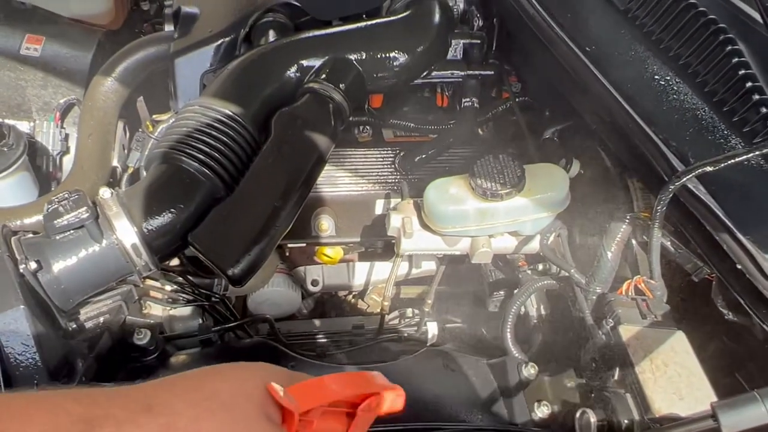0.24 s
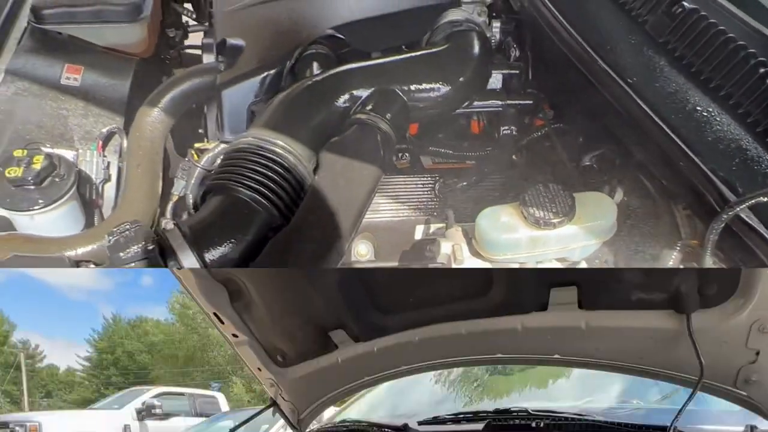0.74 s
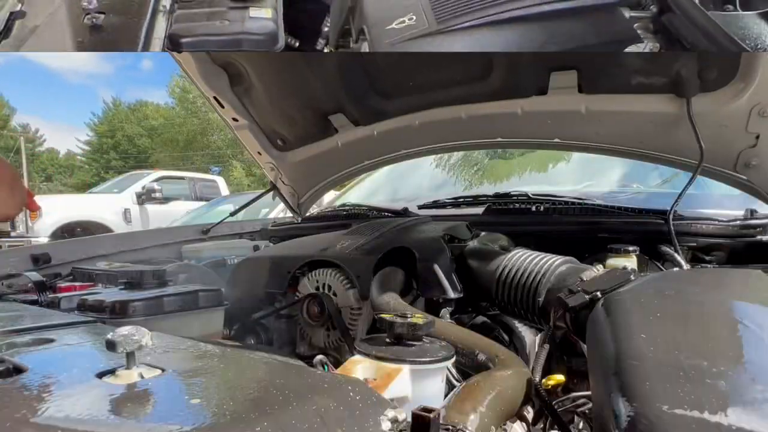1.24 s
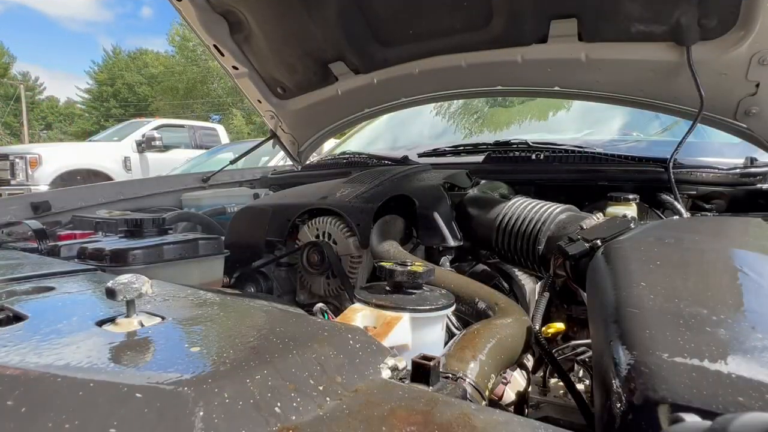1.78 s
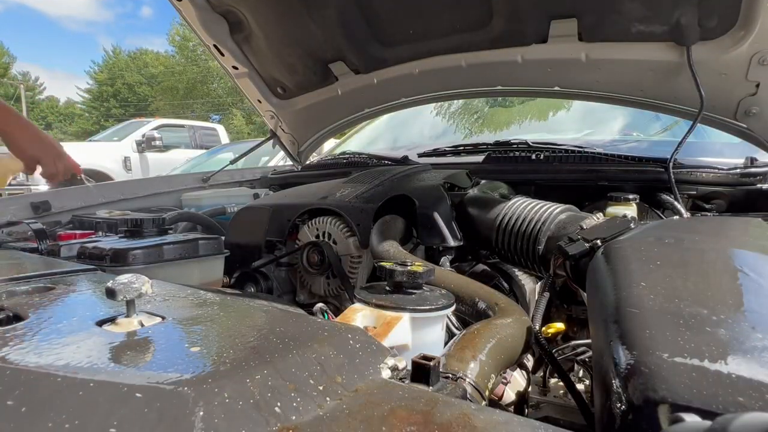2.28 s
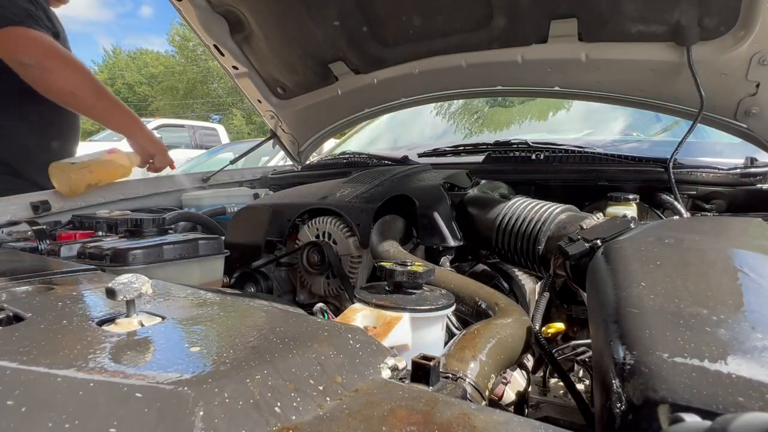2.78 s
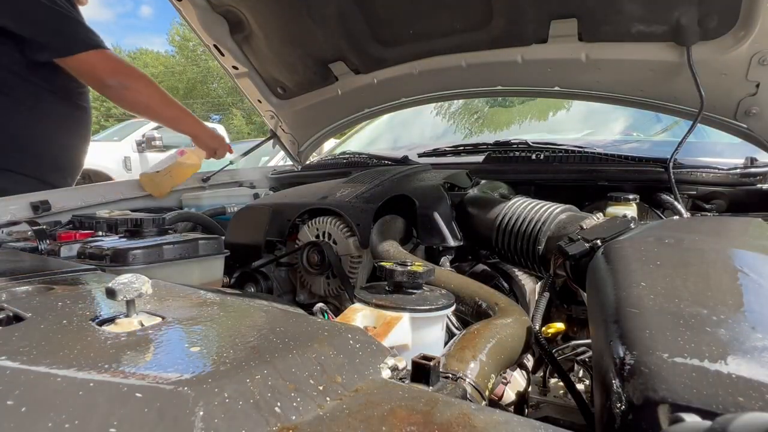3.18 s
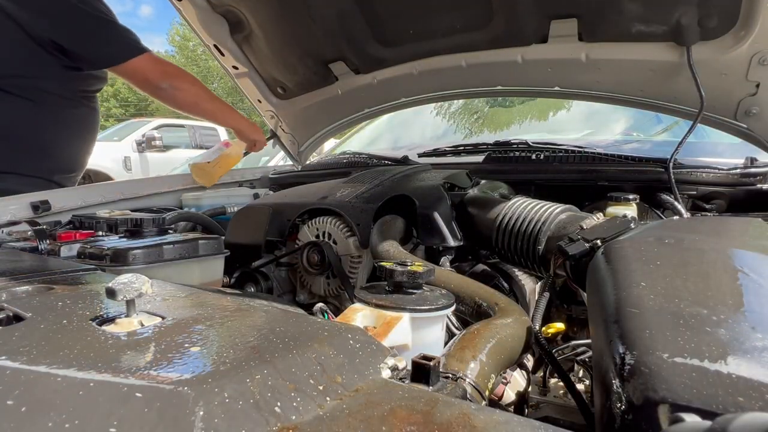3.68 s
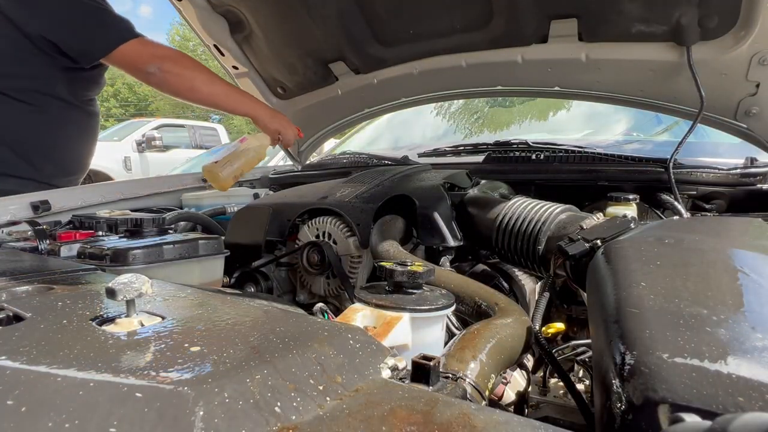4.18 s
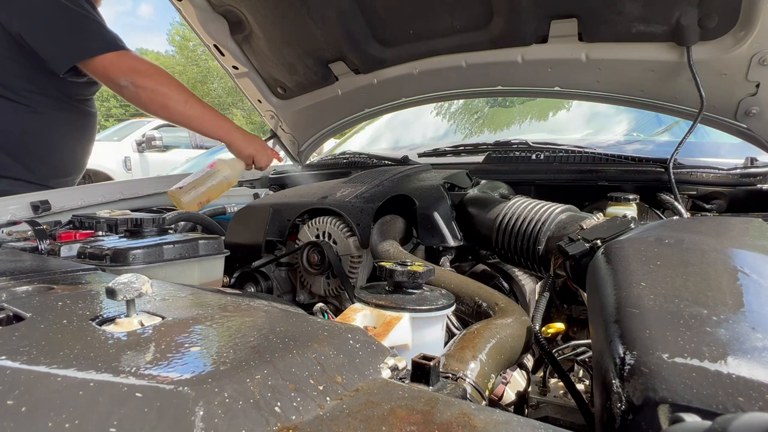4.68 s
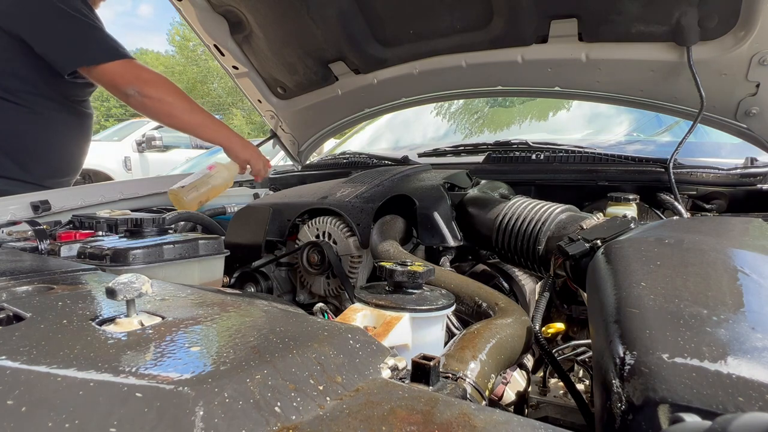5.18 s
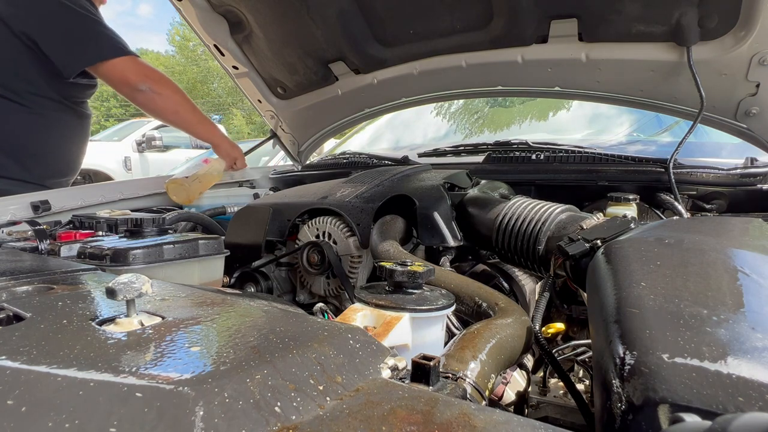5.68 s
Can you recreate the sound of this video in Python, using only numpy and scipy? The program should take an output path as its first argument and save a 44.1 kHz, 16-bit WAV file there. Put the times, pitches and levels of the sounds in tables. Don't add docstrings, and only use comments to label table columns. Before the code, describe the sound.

Outdoors at an open engine bay, a plastic trigger sprayer is squeezed slowly up close: hard snap, breathy hiss, suck of air and rattle back. Just after one second it switches to quick, even pulls further off, each a click, short bright hiss, dull bottle knock and small return rattle. Liquid sloshes faintly. One phone microphone, mono, with soft yard air and low drone.

```python
import sys
import numpy as np
from scipy import signal
from scipy.fft import rfft, irfft
from scipy.io import wavfile
from scipy.ndimage import uniform_filter1d

SR = 44100
rng = np.random.default_rng(int(sys.argv[2]) if len(sys.argv) > 2 else 0)


def nominal_scale(level):
    x = np.asarray(level, float) / 20
    return 10 ** x


def pcm_store(signal):
    levels = np.round(np.clip(np.atleast_2d(signal), -1, 1) * 32767)
    wavfile.write(sys.argv[1], SR, levels.astype(np.int16).T)


N = 261954


def colour(x, table, extra_db=0):
    hz = np.maximum(np.arange(len(x) // 2 + 1) * SR / len(x), 1)
    f, db = np.transpose(table)
    gain_db = np.interp(np.log(hz), np.log(f), db) + extra_db
    y = irfft(rfft(x) * nominal_scale(gain_db), len(x))
    return y / np.sqrt(np.mean(y ** 2))


def ring(x, hz, width_hz):
    return signal.lfilter(*signal.iirpeak(min(hz, 20000), hz / width_hz, fs=SR), x)


def cut(x, hz, kind):
    return signal.lfilter(*signal.butter(2, hz, kind, fs=SR), x)


def walk(rate, size):
    k = int(SR / rate)
    steps = np.repeat(rng.standard_normal(size // k + 1), k)
    return 1.176 * uniform_filter1d(steps, k)[:size]


def add(out, x, s):
    i = int(s * SR)
    x = x[max(-i, 0):N - i]
    out[max(i, 0):max(i, 0) + len(x)] += x


def strokes():
    # start_s, end_s, early_db, middle_db, treble_minus_presence_db
    slow_jets = [(-0.05, 0.069, -28, -20, -6), (0.125, 0.133, -36, -33.5, -15),
                 (0.3154, 0.434, -23.5, -21, -7), (0.488, 0.501, -42, -34, -18),
                 (0.668, 0.772, -28.5, -25.0, -6), (0.829, 0.851, -46, -41, -11),
                 (0.931, 1.012, -36.5, -33, 6), (1.043, 1.097, -32, -32, -2),
                 (1.0862, 1.142, -25.5, -28, 4)]
    # time_s, level_db, ring_hz, treble_minus_presence_db
    slow_clicks = [(0.1334, -28.5, 4500, -21), (0.1798, -34.5, 5900, -34), (0.2697, -58, 4440, -33),
                   (0.2835, -52, 4500, -20), (0.307, -42, 2580, -4), (0.315, -10.5, 4460, -31),
                   (0.498, -31, 4420, -10), (0.5513, -37.5, 4480, -33), (0.6585, -39, 3200, -21),
                   (0.668, -14.5, 4060, -28), (0.847, -35, 6980, -4), (0.9026, -45, 3200, -34),
                   (0.997, -36, 4400, -20), (1.0323, -21.5, 4230, -40), (1.0867, -23.5, 4470, -1),
                   (1.1684, -38, 5330, -21)]
    # snap_s, snap_db, ring_hz, jet_length_s, jet_db
    fast_pulls = [(1.2118, -16.5, 4300, 0.046, -27.5), (1.3317, -20, 4640, 0.054, -27),
                  (1.451, -22, 4000, 0.049, -30.5), (1.571, -24, 4830, 0.051, -29),
                  (1.6925, -21.5, 9100, 0.057, -27), (1.8192, -20.5, 5060, 0.058, -28),
                  (1.947, -24, 5130, 0.056, -28.5), (2.076, -24, 4070, 0.055, -28.5),
                  (2.202, -22.5, 4600, 0.043, -28.5), (2.3222, -18, 5150, 0.05, -26.5),
                  (2.4454, -26, 7200, 0.059, -28), (2.5726, -19, 10200, 0.053, -27.5),
                  (2.6975, -20, 9300, 0.056, -27.5), (2.824, -20.5, 9100, 0.054, -27.5),
                  (2.948, -17, 7500, 0.051, -27.5), (3.075, -20.5, 5440, 0.048, -26),
                  (3.1992, -18.5, 7300, 0.062, -28), (3.33, -21.5, 3440, 0.056, -29.5)]
    more_fast_pulls = [(3.4543, -20.5, 9500, 0.053, -27.5), (3.5871, -23, 9500, 0.059, -28),
                       (3.726, -18.5, 5050, 0.056, -28), (3.8586, -20, 7300, 0.059, -27),
                       (3.9942, -20.5, 3220, 0.06, -27), (4.1324, -18, 7600, 0.06, -27),
                       (4.2728, -20.5, 9500, 0.055, -26), (4.4294, -22.5, 5300, .056, -27),
                       (4.5686, -20.5, 7600, 0.058, -28.5), (4.7057, -17.5, 5300, 0.058, -28.5),
                       (4.8405, -20, 5700, 0.059, -28.5), (4.9834, -20, 7750, 0.058, -30.5),
                       (5.1225, -22.5, 7200, 0.056, -30), (5.257, -24.5, 4080, 0.06, -30.5),
                       (5.391, -21, 4100, 0.061, -30.5), (5.5263, -20.5, 3960, 0.054, -29.5),
                       (5.6667, -19, 5550, 0.059, -31), (5.8027, -21.5, 9200, 0.063, -30.5)]
    # time_s, snap_treble_minus_presence_db, aim_db (jet treble),
    # knock_db, pump_head_share_db
    shade = [(1.2123, -4.5, 13, -37, -1.5), (1.3318, 2, 13, -36.0, -2.5), (1.452, 1, 6.5, -36, -4),
             (1.571, -4, 10.5, -37, -3), (1.6925, 2.0, 13.5, -37, -2.5), (1.8188, -4, 11, -36.5, -3),
             (1.9473, -4, 12, -37.5, -3.5), (2.076, 2, 13, -36, -10), (2.203, 2, 13.5, -35.5, -7.5),
             (2.3222, 7, 17, -38, -7.0), (2.4462, 3.5, 14.0, -38.0, -9), (2.5726, 5, 15.0, -35.5, -8),
             (2.6983, 4.0, 17, -36.0, -7), (2.824, 7, 13, -34.5, -8), (2.9481, 2.5, 16, -33.5, -8.5),
             (3.075, 5, 14, -36.5, -8), (3.1995, 1, 17.5, -35.5, -6.5), (3.33, 2, 15, -36, -9),
             (3.4547, 1, 17.0, -36, -13), (3.5871, 9, 16.0, -36.5, -8), (3.7258, 1.5, 16.5, -33.0, -11),
             (3.8591, 1, 14.5, -34, -11), (3.9945, 0.5, 16.5, -31.5, -11.5), (4.1326, 2.0, 16, -32, -8.5),
             (4.2731, 2, 13.5, -32.5, -5.5), (4.4292, 5.0, 14.5, -32, -6.5), (4.5686, 8, 12.0, -33.0, -9),
             (4.7057, 2.5, 12, -33, -8.5), (4.8407, 6, 13, -32.5, -8.5), (4.9834, 6, 11, -34.0, -8.5),
             (5.1223, 2, 11, -29.5, -12), (5.257, 0, 12, -33, -10.5), (5.3907, 4.5, 12.0, -32.5, -9.5),
             (5.5266, 2, 14, -32.5, -7.5), (5.6665, 0, 10.5, -33.5, -6), (5.8028, 1, 10.5, -34.5, -8)]
    # time_s, bottle_hz
    grip = [(1.2, 406), (1.4, 521), (1.85, 515), (2.0, 356), (2.9, 350), (3.9, 332), (4.3, 353), (5.9, 343)]
    # time_s, level_db
    slack_moves = [(1.2754, -45), (1.303, -47), (1.3155, -60), (2.2636, -46), (2.3889, -37), (3.571, -45),
                   (3.7109, -38), (3.8434, -43), (3.9769, -42), (4.116, -37), (4.6911, -31), (4.8235, -42),
                   (4.9651, -45), (5.6457, -46), (5.873, -44), (4.4045, -51), (4.548, -52), (4.906, -45),
                   (5.101, -52), (5.2485, -45), (5.782, -48)]
    # time_s, peak_db, ring_hz, treble_minus_presence_db
    returns = [(1.292, -32.5, 4100, -4), (1.4127, -29.5, 5170, -4), (1.5279, -29, 11800, -4),
               (1.6487, -31, 4230, 0), (1.7779, -30, 9250, 0), (1.9026, -32, 5780, -4),
               (2.0293, -30, 5880, -2), (2.1565, -30, 2700, -4), (2.28, -30, 9270, -3),
               (2.4054, -30, 9400, 0), (2.5288, -31, 2660, -1), (2.6549, -30.5, 6190, -4),
               (2.7821, -31, 10400, -1), (2.9056, -33, 5760, -4), (3.0327, -30, 4030, -4),
               (3.1602, -31, 2900, -4), (3.2883, -31.5, 2560, -6), (3.4146, -31, 5420, -4),
               (3.5443, -33, 2930, -4), (3.6745, -30.5, 5150, -4), (3.8117, -29.5, 7270, -6),
               (3.9479, -31, 2890, -4), (4.084, -30.5, 2530, -4), (4.225, -31, 9780, -4),
               (4.367, -29.5, 7250, -1), (4.5196, -28, 10400, -1), (4.6573, -31, 5700, -4),
               (4.7958, -29, 5560, -4), (4.9317, -32, 5660, -4), (5.076, -32, 6260, -4),
               (5.2121, -29.5, 5010, -4), (5.3467, -29.5, 11700, -1), (5.4794, -29.5, 5840, -4),
               (5.618, -29, 5510, -7), (5.757, -32.5, 5810, -4), (5.898, -30.5, 5540, -6)]
    # time_s, peak_db, bottle_hz, pump_head_share_db
    stray_knocks = [(0.326, -26.5, 470, -8.5), (0.667, -32.5, 442, -2), (0.805, -46, 276.5, -9),
                    (0.993, -53, 314, -2), (1.09, -36, 417, -2), (1.393, -43, 435, -11),
                    (1.762, -37, 637, -25), (2.168, -31.5, 365, -11), (2.278, -38, 357, -15),
                    (2.332, -35.5, 610, -10), (5.244, -37.5, 540, -9)]

    s, snap_db, hz, length, jet_db = np.transpose(fast_pulls + more_fast_pulls)
    tilt_db, aim_db, knock_db, head_db = np.transpose(shade)[1:]
    early_db = jet_db - 1 + 0.7 * rng.standard_normal(len(s))
    jet = list(zip(s, s + length, early_db, jet_db, aim_db))
    snap = list(zip(s, snap_db, hz, tilt_db))
    rattle = [(when + .0008, db - 7.5, stop_hz, treble_db) for when, db, stop_hz, treble_db in returns]
    slack = [(when, db, 7600, 16) for when, db in slack_moves]

    bottle_hz = np.interp(s, *np.transpose(grip))
    knock = list(zip(s + .0065, knock_db, bottle_hz, head_db))
    tap = list(zip(s, knock_db - 15.5, bottle_hz, head_db + 9))
    return slow_jets + jet, slow_clicks + slack + snap + rattle, stray_knocks + knock + tap


def jets(rows):
    # pitch_hz, level_db (per Hz)
    side = [(410, -50), (700, -20.5), (910, -14), (1040, -21), (1560, -10.5), (2300, -15), (2960, -3),
            (3790, -1.5), (5610, -6), (6070, -4), (8530, -4.5), (14000, -14), (16000, -12)]
    # pitch_hz, level_db (per Hz)
    facing = [(410, -54), (700, -22.5), (1460, -16.5), (2220, -18), (2990, -9), (4730, -5.5), (6740, -4),
              (8760, -1.5), (14800, -2.5), (16000, -4)]
    # time_s, first_mode_hz
    shroud = [(1.2, 1770), (2.55, 1930), (3.1, 2200), (5.9, 2140)]
    out, size, lead_s = np.zeros(N), 12288, .005
    t = np.arange(size) / SR - lead_s
    hz = 700 * 2 ** np.arange(0, 4.6, .25)
    side_db, front_db = (np.interp(np.log(hz), np.log(f), db) for f, db in map(np.transpose, (side, facing)))
    for start, end, early_db, mid_db, tilt_db in rows:
        late_db = mid_db - 0.3
        span = end - start
        front = np.clip((tilt_db + 6.5) / 17.2, -.4, 1.3)
        opening = np.clip(t / span, 0, 1)
        noise = rng.standard_normal((2, size))

        lip_db = 1.25 * rng.standard_normal(len(hz))
        shape = np.transpose([hz, side_db + front * (front_db - side_db) + lip_db])
        shape = np.vstack([[(250, shape[0, 1] - 25)], shape])

        cup = np.arange(size // 2 + 1) * SR / size / np.interp(start, *np.transpose(shroud))
        depth_db = -3.2 * np.clip(front, 0, 1)
        shut, wide = (colour(noise[0], shape, depth_db * np.cos(np.pi * cup * k)) for k in (1.06, .95))
        hiss = shut + opening * (wide - shut)

        lead = [-.005, -.004, -.0008, .001, min(.006, .12 * span)]
        leak_db = early_db - 16 + 25 * min(front, 0)
        lead_db = [-70, leak_db, early_db - 11, early_db - 2, early_db - 6.5]
        hold = [0.13 * span, 0.37 * span, 0.76 * span, span]
        hold_db = [early_db, mid_db, late_db, late_db - 4.5]
        fall = [span + 0.0023, span + 0.023, span + 0.044]
        fall_db = [late_db - 13, late_db - 25.0, -90]
        db = np.interp(t, lead + hold + fall, lead_db + hold_db + fall_db)

        pressure_db = 0.72 * np.clip(db - mid_db, -14, 3)
        bright_db = np.interp(opening, [0, .12, .5, .7, 1], [7, -4.5, 0.9, 0.0, -5.5])
        treble = cut(hiss, 5300, "high") * (nominal_scale(pressure_db + bright_db) - 1)

        low = cut(hiss, 4100, "low")
        hiss = low * nominal_scale(1.8 * walk(300, size)) + (hiss - low) * nominal_scale(0.6 * walk(300, size))
        spit = nominal_scale(1.0 * walk(1500, size))
        mist_db = mid_db - 28.5 - 75 * np.maximum(t - span, 0)
        mist = colour(noise[1], shape) * nominal_scale(mist_db + 2.0 * walk(123.4, size)) * opening
        add(out, (hiss + treble) * spit * nominal_scale(db) + mist, start - lead_s)
    return out


def clicks(rows):
    out, size = np.zeros(N), 1024
    t = np.arange(size) / SR
    for s, db, hz, tilt_db in rows:
        decay = .00035 if db > -30 else .0011
        rise = 1 - np.exp(-(t / .00025) ** 2)
        blow = rng.standard_normal(size) * rise * np.exp(-t / decay)
        if db < -33:
            blow[240:] += nominal_scale(-6.5) * blow[:-240]
        else:
            lag = int(.0021 * SR * rng.uniform(.8, 1.2))
            blow[lag:] += nominal_scale(-7.5 + rng.uniform(-9, 2.5)) * blow[:size - lag]

        floor_hz = 1200 if tilt_db < -12 else 2200 if db < -33 else 2900
        body = cut(ring(blow, 4260, 3240), floor_hz, "high")
        body = body + (1.2 if db > -33 else .6) * ring(blow, hz, 600)
        body = body + 0.35 * ring(blow, 1.37 * hz, 700)
        edge = cut(cut(blow, 6700, "high"), min(15800 + 300 * tilt_db, 19000), "low")
        body = body / np.linalg.norm(body) * nominal_scale(-tilt_db / 2)
        edge = edge / np.linalg.norm(edge) * nominal_scale(tilt_db / 2 - 2.0)
        snap = body + edge
        add(out, snap / np.linalg.norm(snap) * nominal_scale(db + 19.5), s - .0002)
    return out


def mode(hz, db, t60, rise, sag=0):
    t = np.arange(4000) / SR
    turn = 2 * np.pi * hz * (t + sag * 0.0061 * (1 - np.exp(-t / 0.0055)))
    swell = 1 - np.exp(-(t / rise) ** 2)
    return nominal_scale(db) * np.sin(turn) * swell * np.exp(-np.log(1000) * t / t60)


def knocks(rows):
    # pitch_hz, level_db
    head = [(990, 1.5), (1190, 4.5), (1450, -1), (1950, -2.5)]
    out = np.zeros(N)
    for s, db, hz, head_db in rows:
        detune = 1 + 0.055 * rng.standard_normal(5)
        scatter_db = 1.5 * rng.standard_normal(5)
        hit = mode(hz * np.sqrt(detune[4]), 0.2, 0.03, 0.0035, 0.13)
        hit += mode(0.724 * hz * detune[4], -6.5, 0.049, 0.0057)
        hit += mode(1.508 * hz * detune[0], scatter_db[0] - 5, 0.03, 0.0064, 0.21)
        for (f, f_db), d, g in zip(head, detune[1:], scatter_db[1:]):
            hit += mode(f * d, head_db + f_db + g, 0.023, 0.0016)
        rough_db = 1.1 * walk(485, len(hit))
        add(out, hit * nominal_scale(db + 6.5 + rough_db), s)
    return out


def hand_bumps():
    # start_s, peak_db, pitch_hz, t60_s (time to fade by 60 dB)
    bumps = [(.3272, -35, 634, .036), (.3302, -26, 163, .057), (.3312, -32.5, 296, .066),
             (.6785, -29.5, 161, .08), (.6795, -35, 294, .06), (.8775, -44, 2100, .02),
             (2.1192, -36, 650, .015), (2.1335, -29, 2200, .01), (2.1362, -36, 1500, .01),
             (2.1672, -28, 173, .05), (2.1872, -34, 222, .036), (2.2952, -37.5, 247, .07),
             (2.2972, -36, 650, .018), (2.3102, -41, 1700, .008), (2.3602, -38, 670, .016),
             (2.6002, -37, 646, .022), (2.6022, -41, 1900, .01), (2.7052, -38, 1950, .02),
             (2.7182, -39, 1150, .01), (2.7252, -41, 523, .03), (2.7352, -38, 900, .015),
             (2.7452, -40, 1500, .008), (2.7792, -43, 1990, .015), (2.8312, -40, 1820, .04),
             (3.4972, -34, 1250, .014), (3.4992, -27.5, 440, .04), (3.5092, -36, 1550, .014),
             (3.5122, -28, 460, .036), (3.5152, -38, 1800, .01), (5.1782, -45, 2080, .035),
             (5.2452, -42, 2130, .022)]
    out = np.zeros(N)
    for s, db, hz, t60 in bumps:
        add(out, mode(hz, db + 4.0 + 2.5 * walk(400, 4000), t60, 0.81 / hz, 0.043), s)
    return out


def thin_bass(x):
    return cut(cut(x, 110, "high"), 110, "high")


def slosh():
    # start_s, end_s, level_db
    tilts = [(2.097, 2.396, -54), (2.542, 2.765, -50.5), (3.492, 3.525, -49), (2.44, 2.52, -53)]
    t = np.arange(N) / SR
    grains = (rng.random(N) < 600 / SR) * rng.standard_normal(N)
    grains = grains * nominal_scale(0.9 * rng.exponential(size=N))
    body = ring(grains, 580, 300) + 0.7 * ring(grains, 1800, 1200)
    gain = sum(nominal_scale(db) * np.sin(np.pi * np.clip((t - a) / (b - a), 0, 1)) for a, b, db in tilts)
    return gain * body / body.std()


def bay(x):
    t = np.arange(4000) / SR
    echo = rng.standard_normal(len(t)) * np.exp(-np.log(1000) * t / 0.033) * (t > .0015)
    return x + nominal_scale(-6.0) * signal.fftconvolve(x, echo / np.linalg.norm(echo))[:N]


def yard_air():
    # pitch_hz, level_db (per Hz)
    near = [(18, -40), (30, -24), (60, -2), (210, -4.5), (394, -9), (1500, -14.5), (1950, -21), (2900, -27),
            (4300, -19), (5200, -26), (6600, -23.5), (8000, -17.5), (8700, -36), (16000, -44)]
    # pitch_hz, level_db (per Hz)
    far = [(18, -60), (30, -43), (70, -15), (90, -1.5), (118, 6.5), (194, 8), (345, 3), (844, -4.5),
           (937, -3.5), (2170, -6.5), (10500, -18), (14800, -8.5), (16000, -30)]
    # time_s, first_db, second_db
    share = [(0, -45.5, -77), (.6, -46.5, -77), (.9, -52.5, -50), (1.12, -52.5, -51), (1.2, -66, -51),
             (1.45, -82, -49.5), (3, -111, -50.5), (5.94, -81, -47.5)]
    t = np.arange(N) / SR
    s, near_db, far_db = np.transpose(share)
    out = np.zeros(N)
    for table, db in ((near, near_db), (far, far_db)):
        air = colour(rng.standard_normal(N), table)
        low = cut(air, 580, "low")
        moving = low * nominal_scale(2.3 * walk(6.2, N)) + (air - low) * nominal_scale(1.94 * walk(25, N))
        out += nominal_scale(np.interp(t, s, db)) * moving
    return out


def far_motor():
    # time_s, pitch_hz, level_db
    motor = [(0, 208.7, -47.5), (.3, 215.3, -47), (.45, 213.5, -53.5), (.62, 211, -53.5), (.7, 212.2, -65),
             (.83, 216, -54), (.95, 213, -74)]
    t = np.arange(N) / SR
    s, hz, db = np.transpose(motor)
    turn = 2 * np.pi * np.cumsum(np.interp(t, s, hz) + 4 * walk(29.5, N)) / SR
    level = nominal_scale(np.interp(t, s, db, right=-120) + 3.5 + 2.5 * walk(19, N))
    return level * (np.sin(turn) + nominal_scale(-9.0) * np.sin(2 * turn))


def low_drone():
    # time_s, level_db
    swells = [(0.8, -70), (0.94, -55), (2.49, -55), (2.53, -62), (2.68, -49), (2.78, -60), (3.32, -53.5),
              (4.54, -55), (4.71, -48), (4.79, -63), (4.94, -48), (5.08, -59), (5.25, -47.5), (5.35, -59),
              (5.51, -47), (5.61, -57), (5.72, -46.5), (5.94, -58)]
    t = np.arange(N) / SR
    turn = 2 * np.pi * np.cumsum(117.1 + 3.15 * walk(24.8, N)) / SR
    return nominal_scale(np.interp(t, *np.transpose(swells), left=-120) + 3.0 + 1.9 * walk(12, N)) * np.sin(turn)


def far_whine():
    # time_s, pitch_hz, level_db
    whine = [(3.3, 2960, -75), (3.37, 2990, -60), (3.5, 2965, -60), (3.6, 2920, -61), (3.66, 2970, -70),
             (3.8, 3000, -63), (3.87, 2960, -60), (3.96, 2890, -62), (4.02, 2930, -76)]
    t = np.arange(N) / SR
    s, hz, db = np.transpose(whine)
    turn = 2 * np.pi * np.cumsum(np.interp(t, s, hz) + 45 * walk(140, N)) / SR
    return nominal_scale(np.interp(t, s, db, left=-120, right=-120) + 3.5 + 4.4 * walk(60, N)) * np.sin(turn)


def mains_hum():
    # time_s, level_db
    hum = [(.3, -70), (.48, -51), (.74, -61), (.92, -60), (1.3, -72)]
    t = np.arange(N) / SR
    db = np.interp(t, *np.transpose(hum), left=-120, right=-120)
    return nominal_scale(db + 2) * np.sin(2 * np.pi * 59.7 * t)


def scene():
    jet, click, knock = strokes()
    bottle = jets(jet) + bay(clicks(click) + slosh()) + thin_bass(knocks(knock) + hand_bumps())
    yard = yard_air() + far_motor() + low_drone() + far_whine() + mains_hum()
    mono = bottle + yard
    return np.array([mono, mono])


def band_limit(x):
    return signal.sosfilt(signal.butter(12, 16980, fs=SR, output="sos"), x)


def record(dry):
    top_cut = signal.ellip(10, .2, 42, 15750, fs=SR, output="sos")
    mix = signal.sosfilt(top_cut, dry)
    return band_limit(mix)


dry = scene()
out = record(dry)
pcm_store(out)
```